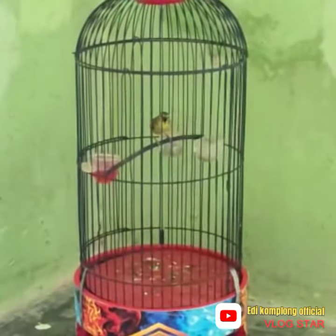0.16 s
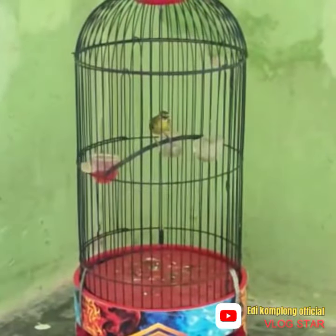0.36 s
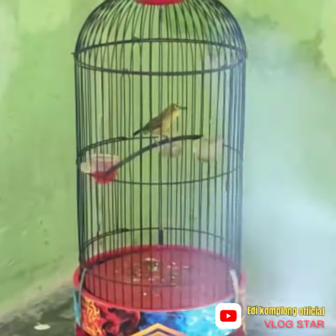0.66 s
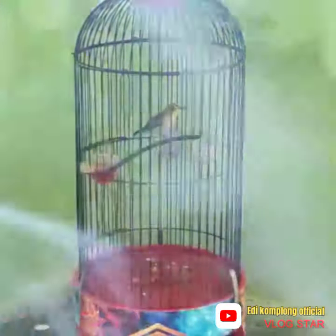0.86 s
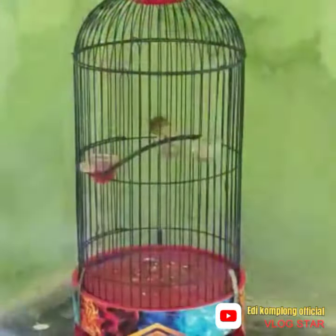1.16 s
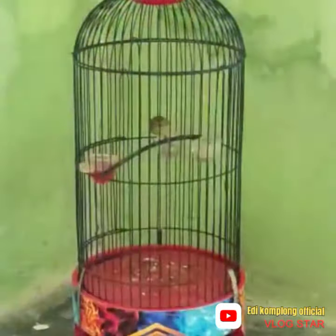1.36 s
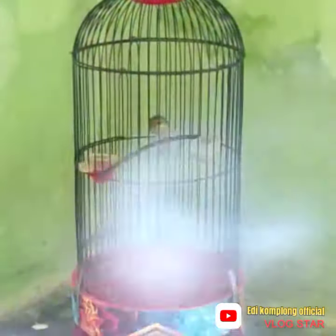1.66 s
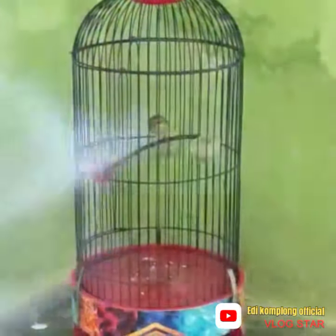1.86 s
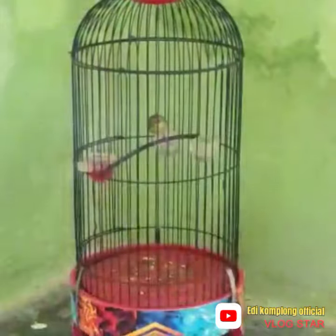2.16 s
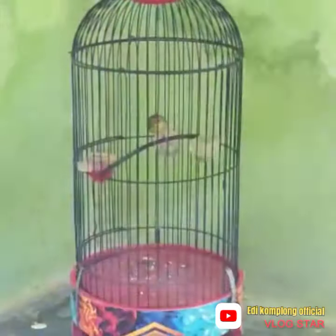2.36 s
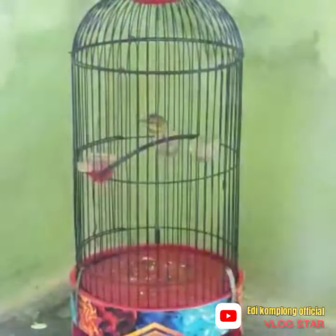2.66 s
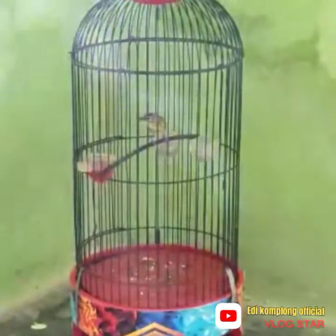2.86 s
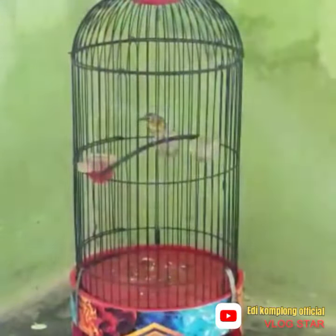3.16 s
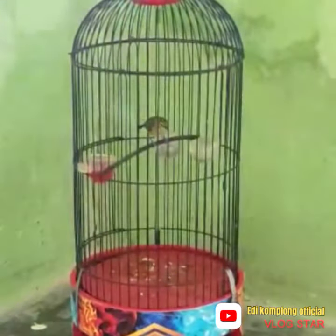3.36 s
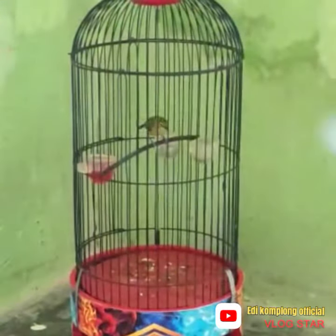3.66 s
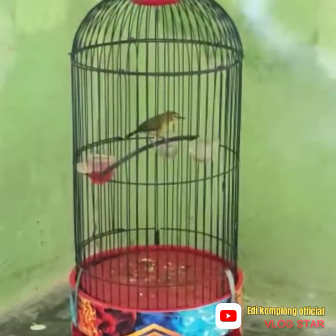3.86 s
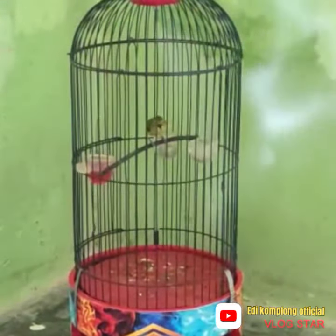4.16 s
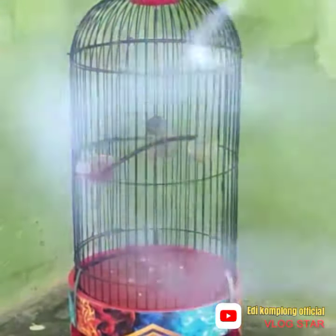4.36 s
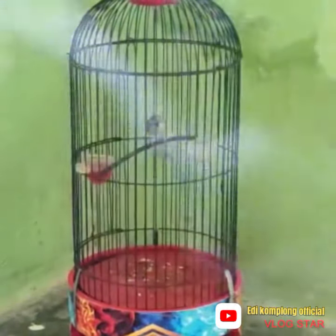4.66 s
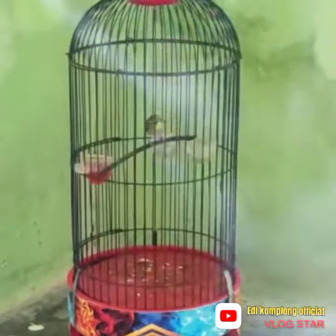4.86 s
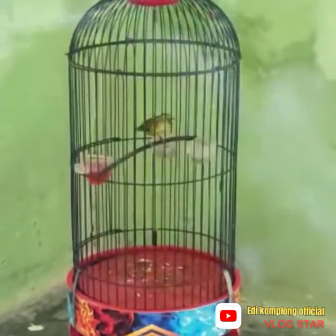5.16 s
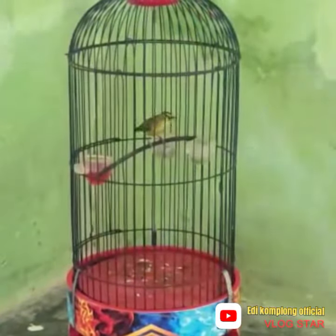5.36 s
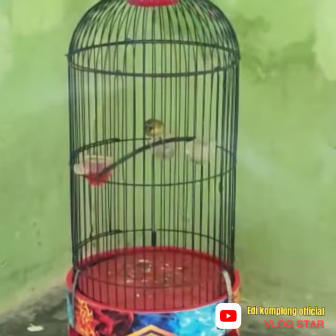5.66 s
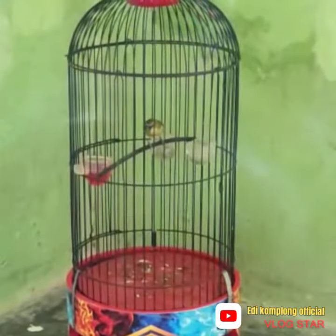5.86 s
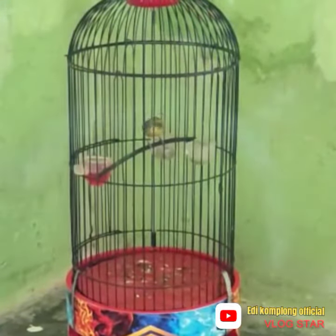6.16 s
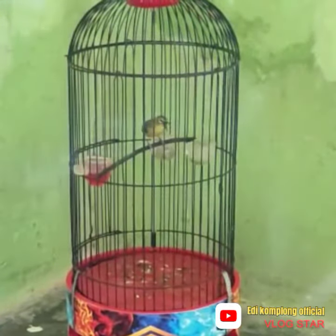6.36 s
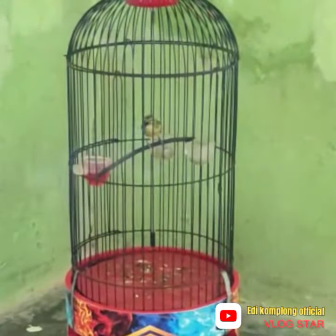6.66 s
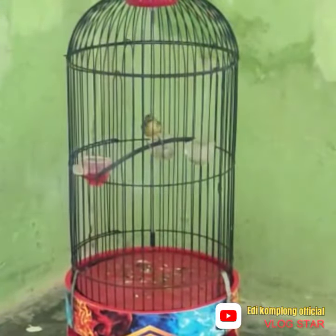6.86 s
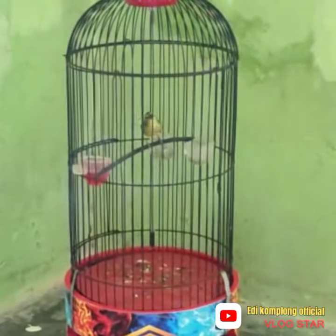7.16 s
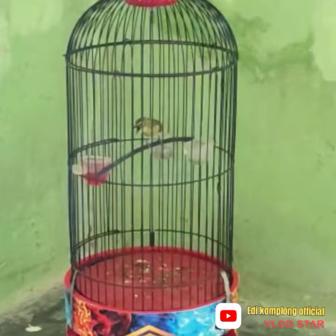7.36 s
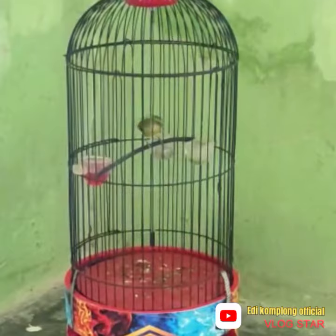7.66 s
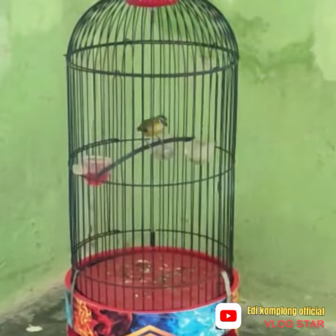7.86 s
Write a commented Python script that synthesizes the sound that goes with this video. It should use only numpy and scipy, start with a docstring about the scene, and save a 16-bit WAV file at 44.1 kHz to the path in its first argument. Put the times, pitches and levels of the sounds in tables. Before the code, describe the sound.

A small caged bird sings high chips, falling whistles and a quick rattle in an echoing room.

```python
"""Caged songbird in a bare room

A white-eye sings in a corner: rising chips, long falling slurs, two-step whistles and a quick rattle.
Each note is one gliding tone with weaker overtones, smeared by echoes from the hard walls.
A second bird answers from further off, wings flutter twice, and faint hoots drift over a low rumble."""
import sys
import numpy as np
from scipy import signal
from scipy.fft import rfft, irfft, next_fast_len
from scipy.io import wavfile
from scipy.ndimage import uniform_filter1d, minimum_filter1d

SR = 44100
rng = np.random.default_rng(int(sys.argv[2]) if len(sys.argv) > 2 else 0)


def write(x):
    x = np.atleast_2d(x).T
    wavfile.write(sys.argv[1], SR, np.round(np.clip(x, -1, 1) * 32767).astype(np.int16))

N = 353682
FFT_SIZE = next_fast_len(N)
FFT_HZ = np.fft.rfftfreq(FFT_SIZE, 1 / SR)

# falling notes: (time [s], length [s], top pitch [Hz], fall [octaves/s], level [dB])
SLURS = [(.667, .128, 7150, 10.1, -3.5), (4.499, .13, 7500, 6.1, -3.5), (4.745, .13, 7530, 6.2, -2.5),
         (5.039, .184, 7330, 5.7, -3), (5.268, .192, 7360, 5.3, -3), (5.516, .172, 7170, 5.3, -4),
         (7.129, .106, 6980, 9.3, -3), (7.324, .11, 7000, 9.3, -3.5), (7.507, .117, 7050, 9.5, -2),
         (7.687, .108, 7150, 10.5, -3), (7.868, .11, 7190, 10.3, -3)]
# rising notes: (time [s], length [s], low pitch [Hz], high pitch [Hz],
# lateness of the rise [1 = midway], level [dB], overtones [dB])
CHIPS = [(0., .024, 4800, 6150, .6, -16, -18), (.018, .096, 4260, 5930, 2.7, -12.5, -24),
         (.17, .07, 4170, 6020, 1.5, -10.5, -25), (.263, .076, 3900, 6220, .9, -12.5, -16),
         (.373, .072, 3620, 6200, .9, -12, -18), (.494, .103, 3350, 4220, .6, -15, -22),
         (6.272, .102, 3600, 6400, .85, -10.5, -23), (6.432, .116, 3780, 6660, .85, -13, -28),
         (6.6, .074, 3820, 6480, .95, -12.5, -23), (6.729, .078, 4150, 6430, 1.15, -11.5, -17),
         (6.844, .076, 3820, 6230, 1., -12.5, -19), (6.947, .098, 3570, 4200, 1., -20.5, -7)]
# how each chip swells and lets go: (share of its length [0-1], level [dB])
CHIP_SWELL = [(0, -15), (.25, -4.3), (.5, -2), (.72, 0), (1, -9)]
# two-step whistles: (time [s], length [s], time on the high step [s], high pitch [Hz],
# low pitch [Hz], high level [dB], low level [dB], overtones [dB])
WHISTLES = [(2.617, .24, .002, 9000, 5950, -14, -17, -22),
            (2.896, .085, .028, 7600, 6500, -7.5, -13.5, -18),
            (4.263, .088, .03, 7900, 6120, -7.5, -15.5, -15.5),
            (4.345, .095, .045, 6300, 5600, -16.5, -18, -24)]
# the rattle's opening squeak: (time [s], top pitch [Hz], bottom pitch [Hz], level [dB], overtones [dB])
SQUEAK = (5.771, 9300, 5000, -12, -10)
# the rattle's first and last chirp: (top pitch [Hz], bottom pitch [Hz], level [dB], overtones [dB])
RATTLE_ENDS = [(7250, 4350, -14, -21), (7300, 4100, -13.4, -27)]
# what the throat and beak let out: (frequency [Hz], level [dB])
BEAK_TONE = [(1900, -48), (2500, -9.5), (3200, -1.5), (4200, -0.5), (6000, -1), (7500, -4), (9000, 8.5),
             (10500, 3), (12500, -3.5), (14500, -6)]
# the hiss in the voice: (frequency [Hz], level [dB])
RASP_TONE = [(1800, -38.5), (2600, -32.5), (3400, -10.5), (4300, -4),
             (6500, 3), (8000, -8), (11000, -1), (14000, -23)]
# wing flutters: (time [s], length [s], level [dB])
FLUTTERS = [(4.028, .22, -43.5), (5.487, 0.4, -47.5)]
# air pushed by the wings: (frequency [Hz], level [dB])
WING_TONE = [(80, -18), (170, -5), (260, -0.5), (400, -11), (650, -7.5), (850, -20), (1080, -8.5),
             (1350, -14), (3000, -18.5), (6000, -13.5)]
# the far bird's falling notes: (time [s], length [s], top pitch [Hz], fall [octaves/s], level [dB])
FAR_SLURS = [(1.1, .084, 7750, 7, -34), (1.765, .096, 7750, 8.6, -33.5), (2.02, .11, 7900, 7.7, -28),
             (2.13, .14, 7950, 5.8, -30), (3.245, .097, 6700, 8, -34), (3.88, .17, 7500, 5.1, -34.5),
             (4.175, .078, 7100, 8.4, -32)]
# the far bird's rising notes: (time [s], length [s], low pitch [Hz], high pitch [Hz],
# lateness of the rise [1 = midway], level [dB], overtones [dB])
FAR_CHIPS = [(1.39, .11, 4100, 4500, .8, -54, -32), (1.89, .13, 4830, 5450, .8, -43.5, -17),
             (3.66, .16, 4250, 4480, .5, -56, -35)]
# distant hoots: (time [s], length [s], start pitch [Hz], end pitch [Hz], level [dB])
HOOTS = [(1.441, 0.24, 543, 563, -56.5), (1.675, 0.22, 577, 599, -64), (1.937, .15, 604, 603, -65.5),
         (2.559, .22, 748, 790, -59)]
# first echoes off the walls: (left delay [s], right delay [s], level against the direct sound [dB])
WALL_ECHOES = [(.0036, 0.0046, -1), (0.0126, .0150, -12.5), (0.0175, 0.017, -2), (0.0242, .0270, -7)]
# how long the room rings: (frequency [Hz], time to fade by 60 dB [s])
RING_TIMES = [(500, 0.64), (4000, 0.76), (7000, 0.61), (13000, 0.65)]
# background rumble and hiss: (frequency [Hz], level [dB])
BACKGROUND_TONE = [(20, 0), (34, 6.5), (50, -9.5), (100, -5), (160, -11.5), (400, -16.5), (620, -16.5),
                   (1100, -24), (2500, -27), (4300, -29.5), (6000, -34), (9000, -23.5), (14500, -41.5)]
# how the two microphones differ: (frequency [Hz], left minus right [dB])
MIC_TILT = [(4000, 0.5), (8000, -2), (10500, 4.5), (12500, 12.5), (14500, 8)]


def bird_note(length, pitches, levels_db, overtones_db, attack_s, release_s, waver, blur):
    """The bird's voice box: one gliding, unsteady tone whose two overtones grow with air pressure."""
    t = np.arange(int((length + release_s) * SR)) / SR
    glide_hz, db, unrest = (np.interp(t, np.linspace(0, length, len(curve)), curve)
                            for curve in (pitches, levels_db, np.atleast_1d(waver)))
    # as the air runs out the note fades, and a falling note sinks on at half speed
    overtime = np.maximum(t - length, 0)
    end_slope = min((pitches[-1] - pitches[-2]) * (len(pitches) - 1) / length, 0)
    hz = uniform_filter1d(glide_hz + end_slope * overtime / 2, len(t) // 10, mode="nearest")
    hz *= 1 + unrest * wander(len(t), 350)
    phase = 2 * np.pi * np.cumsum(hz) / SR
    overtones = 0
    for multiple, strength in ((2, 1), (3, gain(-5))):
        roughness = blur * wander(len(t), 1500)
        overtones += strength * np.sin(multiple * phase + roughness) * (multiple * hz < SR / 2)
    overtones *= gain(overtones_db + .7 * (db - db.max()) + 3 * wander(len(t), 62))
    fade_in = np.sin(np.pi / 2 * np.minimum(t / attack_s, 1)) ** 2
    fade_out = (1 - overtime / release_s) ** 2
    pressure = fade_in * fade_out * gain(db + 2.5 * wander(len(t), 160))
    return np.sqrt(2) * pressure * (np.sin(phase) + overtones)


def slurs(notes, accent_db, fade_db_per_octave, end_fade_db, overtones_db, waver, fray, attack_s):
    """Falling notes that open with an extra push of air and get weaker and rougher as they drop."""
    out = np.zeros(N)
    accent_s, break_s, extra_octaves_per_s = .014, .14, 6
    for start, length, top_hz, fall, db in notes:
        age = length * progress()
        # a slur held too long breaks and falls faster
        octaves = fall * age + extra_octaves_per_s * np.maximum(age - break_s, 0)
        push_db = db - accent_db * (1 - np.exp(-age / accent_s))
        levels_db = push_db - fade_db_per_octave * octaves - end_fade_db * progress() ** 8
        add(out, start, bird_note(length, top_hz / 2 ** octaves, levels_db, overtones_db, attack_s,
                                  release_s=.03, waver=waver + fray * octaves ** 2, blur=.7))
    return out


def chips(notes, waver, rise_share=.88):
    """Short notes that swell as they swing up an S-curve, then briefly hold their top pitch."""
    out = np.zeros(N)
    swell_db = np.interp(progress(), *np.transpose(CHIP_SWELL))
    rise = np.minimum(progress() / rise_share, 1)
    for start, length, low_hz, high_hz, lateness, db, overtones_db in notes:
        pitches = low_hz + (high_hz - low_hz) * np.sin(np.pi / 2 * rise ** lateness) ** 2
        add(out, start, bird_note(length, pitches, db + swell_db, overtones_db,
                                  attack_s=.011, release_s=.006, waver=waver, blur=.55))
    return out


def whistles(step_s=.008, sag_hz_per_s=3700, end_fade_db=16):
    """Clear whistles that start high and step down to a lower pitch, sagging all the while."""
    out = np.zeros(N)
    for start, length, hold, high_hz, low_hz, high_db, low_db, overtones_db in WHISTLES:
        age = length * progress()
        high_share = np.exp(-np.maximum(age - hold, 0) / step_s)
        pitches = low_hz + (high_hz - low_hz) * high_share - sag_hz_per_s * age
        levels_db = low_db + (high_db - low_db) * high_share - end_fade_db * progress() ** 8
        add(out, start, bird_note(length, pitches, levels_db, overtones_db,
                                  attack_s=.011, release_s=.01, waver=.013, blur=.55))
    return out


def rattle(first_chirp_s=5.831, spacing_s=.0578, chirp_s=.022, count=7, rebound_db=-6):
    """A shrill squeak, then a row of steep, harsh downward chirps, each with a weaker rebound."""
    out = np.zeros(N)
    chirps = np.c_[first_chirp_s + spacing_s * np.arange(count), np.linspace(*RATTLE_ENDS, count)]
    for start, top_hz, bottom_hz, db, overtones_db in [SQUEAK, *chirps]:
        pitches = (top_hz, np.sqrt(top_hz * bottom_hz), bottom_hz)
        for delay, peak_db in ((0, db), (chirp_s, db + rebound_db)):
            add(out, start + delay, bird_note(chirp_s, pitches, (peak_db, peak_db - 2), overtones_db,
                                              attack_s=.0015, release_s=.0027, waver=.025, blur=2))
    return out


def rasp(voice, db):
    """Hiss that follows the strength of each note."""
    strength = np.sqrt(np.abs(uniform_filter1d(voice ** 2, size=128)))
    hiss = shape_tone(rng.standard_normal(N), RASP_TONE)
    return gain(db) * strength * normalize(hiss)


def wings(beats_per_s=24):
    """Short flutters: a puff of air at every wingbeat."""
    effort = np.zeros(N)
    for start, length, db in FLUTTERS:
        t = np.arange(int(length * SR)) / SR
        beats = 1 + np.sin(2 * np.pi * beats_per_s * t)
        add(effort, start, gain(db) * np.sin(np.pi * t / length) * beats)
    return effort * normalize(shape_tone(rng.standard_normal(N), WING_TONE))


def hoots():
    """Soft, low calls of some animal far outside."""
    out = np.zeros(N)
    for start, length, start_hz, end_hz, db in HOOTS:
        add(out, start, bird_note(length, (start_hz, end_hz), (db, db), overtones_db=-13.5,
                                  attack_s=.011, release_s=.0303, waver=.012, blur=0))
    return out


def room(sound, direct_db, corner_db, tail_db, corner_ring_s=.14, build_s=.014, right_lag_s=.00007):
    """Hard walls: the direct sound, first echoes, a quick scatter in the corner and a long tail."""
    t = np.arange(SR) / SR
    hz = np.fft.rfftfreq(SR, 1 / SR)
    noise_spectrum = rfft(rng.standard_normal((2, SR)))
    band_hz, ring_times = np.transpose(RING_TIMES)
    tail = 0
    for ring_s, one_band in zip(ring_times, np.eye(len(band_hz))):
        band = read_curve(np.c_[band_hz, one_band], hz)
        tail += irfft(noise_spectrum * band, SR) * gain(-60 * t / ring_s)
    corner = rng.standard_normal((2, SR)) * gain(-60 * t / corner_ring_s)
    build_up = 1 - np.exp(-t / build_s)
    echoes = gain(tail_db) * normalize(tail * build_up) + gain(corner_db) * normalize(corner * build_up)
    echoes /= np.sqrt(SR)
    for left_s, right_s, db in [(0, right_lag_s, 0), *WALL_ECHOES]:
        echoes[[0, 1], [int(left_s * SR), int(right_s * SR)]] += gain(direct_db + db)
    return signal.fftconvolve(sound[None], echoes, axes=1)[:, :N]


def background(db=-51.7):
    """Steady low rumble and thin hiss; the bass is much the same on both sides."""
    middle, side = shape_tone(rng.standard_normal((2, N)), BACKGROUND_TONE)
    side = shape_tone(side, [(60, -6), (150, -8.5), (500, -5.5), (1000, -1)])
    return normalize(np.array([middle + side, middle - side])) * gain(db)


def gain(db):
    """Turn decibels into a number to multiply by."""
    return 10 ** (np.asarray(db) / 20)


def normalize(sound):
    """Scale a sound to an average strength (rms) of 1."""
    return sound / np.sqrt(np.mean(sound ** 2))


def read_curve(points, hz):
    """Read between (frequency, value) points, with octaves evenly spaced."""
    point_hz, values = np.transpose(points)
    return np.interp(np.log(hz + 1), np.log(point_hz), values)


def shape_tone(sound, points):
    """Turn frequencies up or down along a (frequency [Hz], level [dB]) curve."""
    return irfft(rfft(sound, FFT_SIZE) * gain(read_curve(points, FFT_HZ)), FFT_SIZE)[..., :N]


def wander(size, turns_per_s):
    """A random wobble, roughly 1 to either side of zero."""
    return np.interp(np.arange(size) * turns_per_s / SR, np.arange(1024), rng.standard_normal(1024))


def progress():
    """Even steps from the start of a note (0) to its end (1)."""
    return np.linspace(0, 1, 41)


def add(track, start_s, sound):
    """Mix a sound into a track at the given time."""
    first = max(int(start_s * SR), 0)
    track[first:first + len(sound)] += sound[:N - first]


def scene():
    """The near bird and its wings, the far bird and the hoots, then the background."""
    song = slurs(SLURS, accent_db=5.5, fade_db_per_octave=17.5, end_fade_db=4,
                 overtones_db=-20.5, waver=.02, fray=.045, attack_s=.006)
    song += chips(CHIPS, waver=.016) + whistles()
    chatter = rattle()
    hiss = rasp(song, db=-36) + rasp(chatter, db=-15)
    near_bird = shape_tone(song + chatter, BEAK_TONE) + hiss + wings()
    near = room(near_bird, direct_db=-6, corner_db=-2.2, tail_db=-.9)
    far_bird = slurs(FAR_SLURS, accent_db=2.5, fade_db_per_octave=13, end_fade_db=5,
                     overtones_db=-23, waver=.03, fray=.03, attack_s=.012)
    far_bird += chips(FAR_CHIPS, waver=.04)
    far = room(far_bird + hoots(), direct_db=-17, corner_db=-9.5, tail_db=-1)
    return near + far + background()


def record(dry, ceiling=.9, cutoff_hz=14600):
    """The left microphone hears more top treble; peaks are held down and the very top is cut off."""
    tilt_db = read_curve(MIC_TILT, FFT_HZ) / 2
    heard = irfft(rfft(dry, FFT_SIZE) * gain([tilt_db, -tilt_db]), FFT_SIZE)[:, :N]
    safe_gain = ceiling / np.maximum(np.abs(heard).max(axis=0), ceiling)
    limited = heard * uniform_filter1d(minimum_filter1d(safe_gain, size=301), size=301)
    treble_cut = 1 / np.sqrt(1 + (FFT_HZ / cutoff_hz) ** 400)
    return irfft(rfft(limited, FFT_SIZE) * treble_cut, FFT_SIZE)[:, :N]


dry = scene()
out = record(dry)
write(out)
```